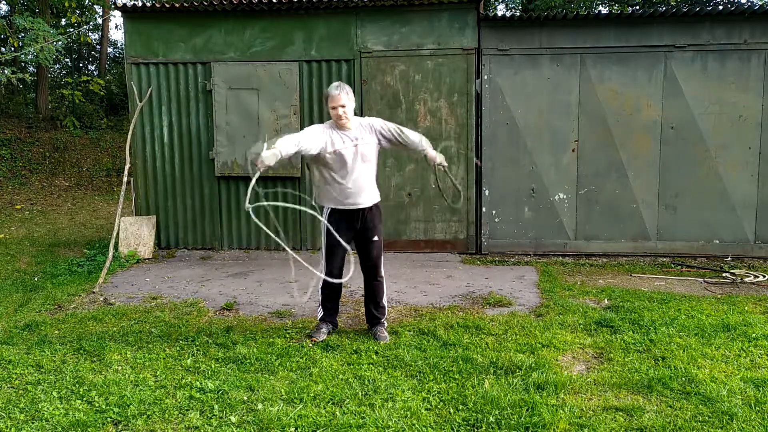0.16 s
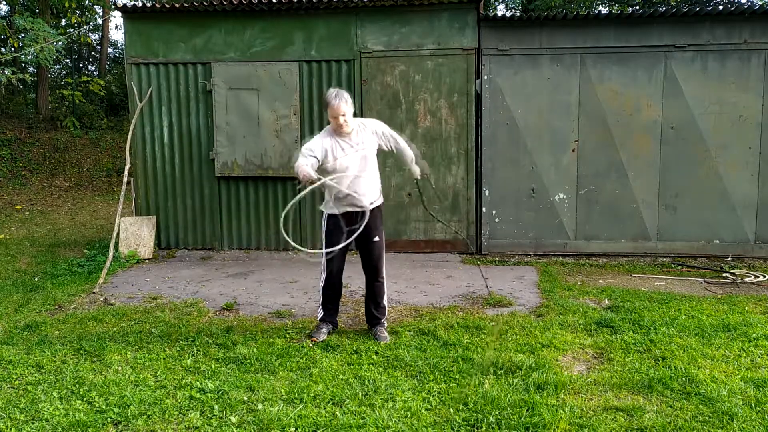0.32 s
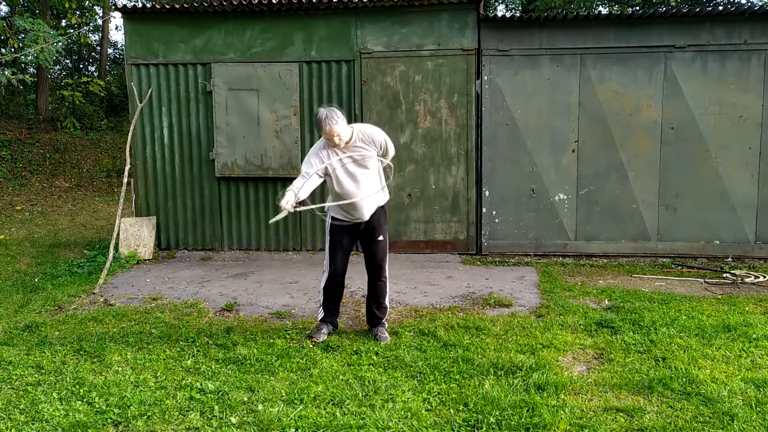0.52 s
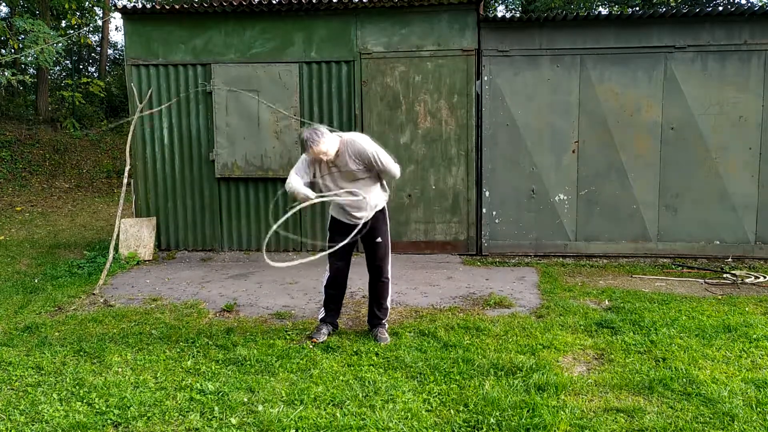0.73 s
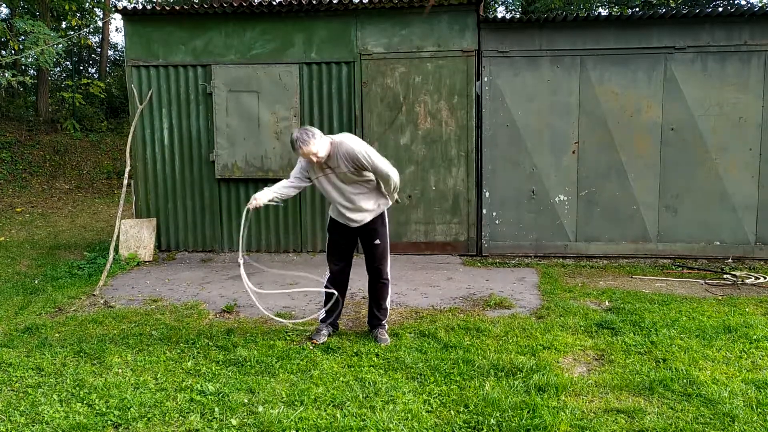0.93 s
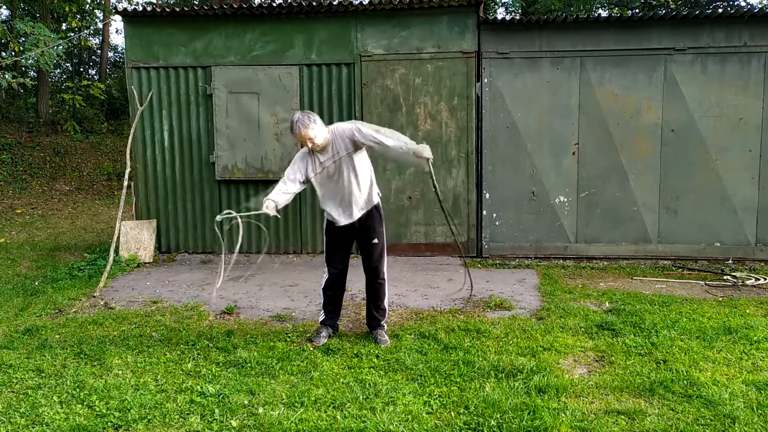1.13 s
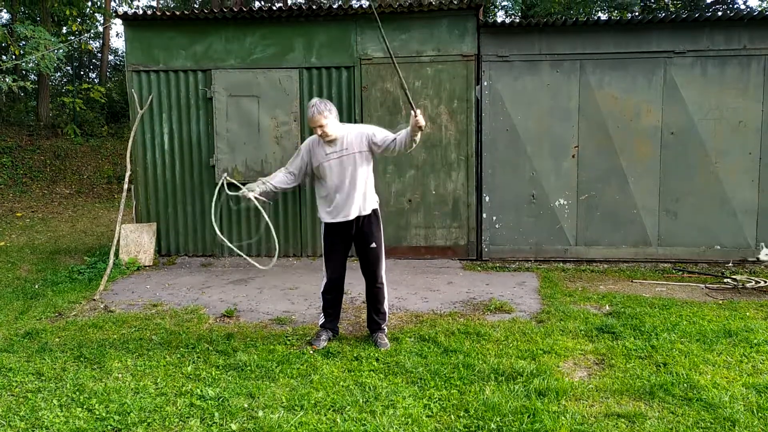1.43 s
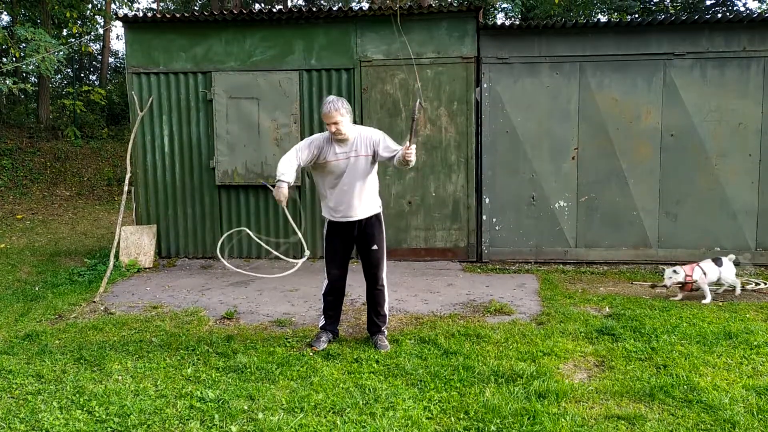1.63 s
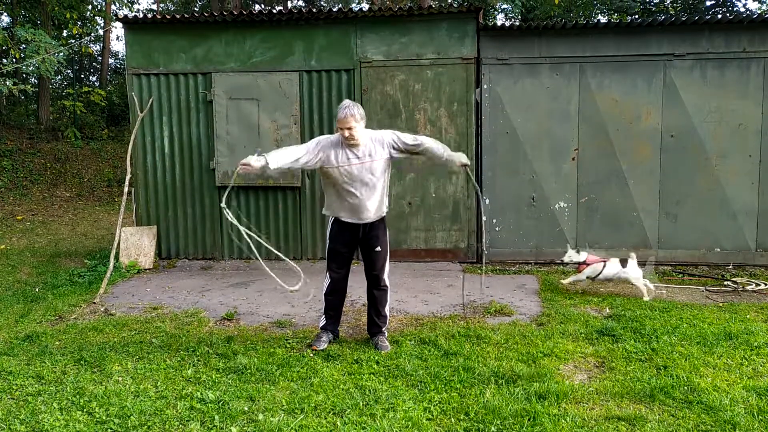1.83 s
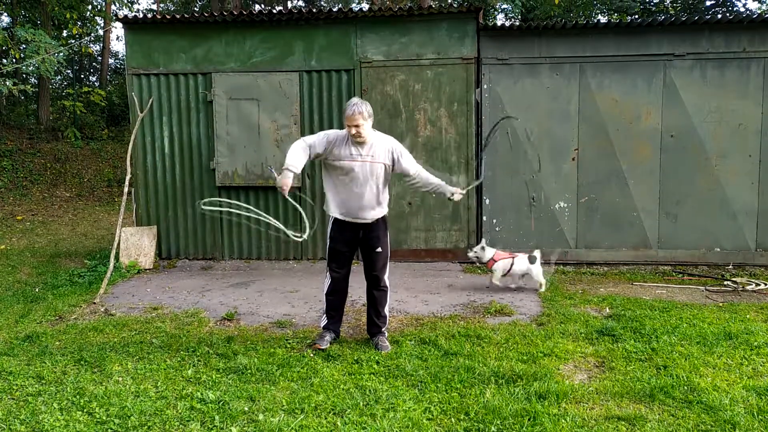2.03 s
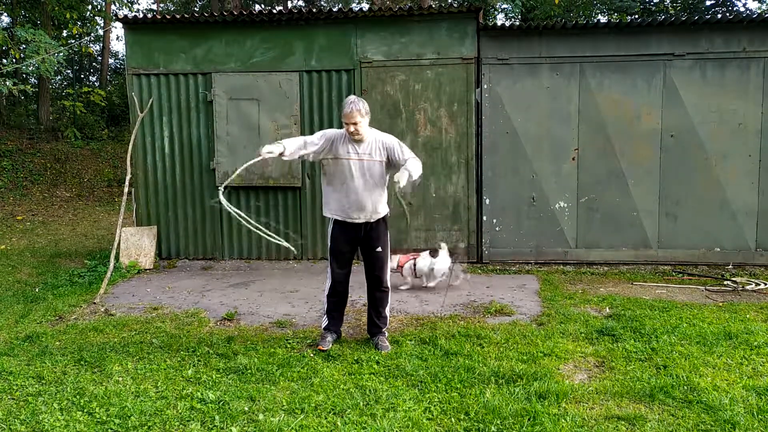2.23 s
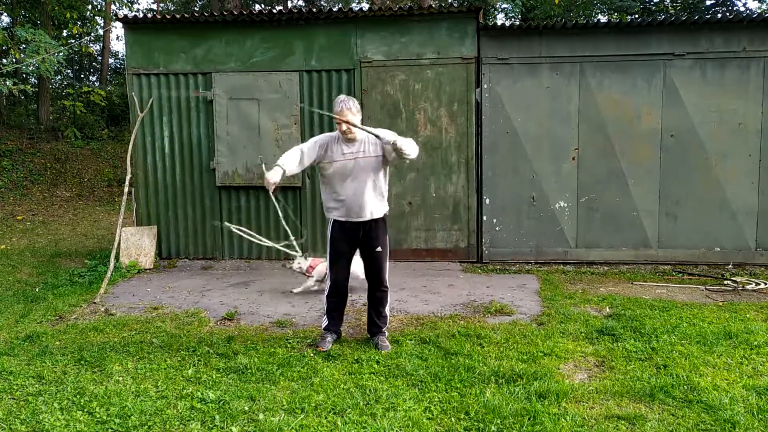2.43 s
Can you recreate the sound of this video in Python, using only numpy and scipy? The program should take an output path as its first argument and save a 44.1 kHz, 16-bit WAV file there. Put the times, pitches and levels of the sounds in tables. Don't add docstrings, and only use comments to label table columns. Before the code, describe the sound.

Loud whip cracks on a lawn beside a metal shed, at about 0.24, 1.14, 1.87 and 2.13 seconds. Each is an instant, clipped snap with small flicks around it, a low microphone thump and a bright hissing echo fading within a third of a second. Between them: faint swishes, whistling cord, cloth and grass rustle, soft thuds near 0.72, 1.3 and 2.37, tiny ticks near 1.8, quiet garden air.

```python
import sys
import numpy as np
from scipy import signal
from scipy.io import wavfile
from scipy.ndimage import uniform_filter1d

SR = 44100
rng = np.random.default_rng(int(sys.argv[2]) if len(sys.argv) > 2 else 0)


def invert_db(level):
    return 10 ** (np.asarray(level, dtype=float) / 20)


def wav_out(sig):
    wavfile.write(sys.argv[1], SR, np.round(np.clip(np.atleast_2d(sig).T, -1, 1) * 32767).astype(np.int16))


N = 114660


def evened(x):
    return x / np.sqrt(np.mean(x ** 2) + 1e-20)


def read(points, hz):
    f, value = np.transpose(points)
    return np.interp(np.log(hz + 1), np.log(f + 1), value)


def add(mix, s, sound):
    part = mix[:, round(s * SR):][:, :sound.shape[-1]]
    part += sound[..., :part.shape[1]]


def play(mix, rows, source):
    for s, *row in rows:
        add(mix, s, source(*row))


def arch(length_s, share):
    u = np.linspace(0, 1, round(length_s * SR))
    share = np.clip(share, .05, .95)
    return np.sin(np.pi / 2 * np.minimum(u / share, (1 - u) / (1 - share))) ** 2


# frequency in Hz, likeness 0-1.
LIKENESS = [(60, 0.8), (300, 1), (640, 0.017), (15000, 0.062)]


def noise(count, field_db, size=256, patch_db=0.):
    hop = size // 4
    frames, hz = count // hop + 5, np.fft.rfftfreq(size, 1 / SR)[:, None]
    a, b, c, d, patches = rng.standard_normal((frames, len(hz), 5)).T
    patches = uniform_filter1d(patches, size=5, axis=0)
    patches = evened(uniform_filter1d(patches, size=9, axis=1))
    left, other = a + 1j * b, c + 1j * d
    same = np.clip(read(LIKENESS, hz), -1, 1)
    z = np.array([left, same * left + np.sqrt(1 - same ** 2) * other])
    z = z * invert_db(field_db(hz, np.arange(frames) * hop / SR) + patch_db * patches)
    return signal.istft(z, nperseg=size, noverlap=size - hop)[1][:, :count]


# frequency in Hz, level in dB per Hz.
AIR_COLOUR = [(18, -59.5), (40, -8), (90, -5), (200, -16), (420, -17.5), (700, -23.5), (1500, -29.5),
              (5000, -30.5), (11000, -30), (16000, -44)]
AIR_DB = -59.5


def air():
    def field_db(hz, s):
        waver_db = 2.5 * np.sin(2 * np.pi * 6.5 * s - 1.5)
        return read(AIR_COLOUR, hz) + (hz > 5000) * waver_db
    return invert_db(AIR_DB) * evened(noise(N, field_db, size=1024, patch_db=4.5))


# start in seconds, length in seconds, fundamental in Hz, level in dB.
DRONE = (.86, .125, 308, -66)


def drone(length_s, hz, db):
    shape = arch(length_s, .5) ** .4
    t = np.arange(len(shape)) / SR
    partials = [invert_db(g) * np.sin(2 * np.pi * k * hz * t) for k, g in enumerate((-9, -1, 0), start=1)]
    return invert_db(db) * shape * sum(partials)[None]


# time in seconds, level in dB.
RUSTLE_LEVEL = [(0, -72), (.15, -63.5), (.3, -68), (.52, -55.5), (.66, -60), (.76, -52.5), (.88, -71),
                (1.05, -72.5), (1.12, -48), (1.399, -61), (1.55, -75), (1.75, -64), (1.85, -51.5),
                (2.05, -57.5), (2.3, -53), (2.4, -55), (2.5, -58), (2.6, -76.5)]
# frequency in Hz, level in dB per Hz.
RUSTLE_COLOUR = [(100, -22.5), (250, -2.5), (500, -9.5), (1000, -8), (2000, -13.5), (4000, -23.5)]


def rustle():
    s, db = np.transpose(RUSTLE_LEVEL)
    x = evened(noise(N, lambda hz, t: read(RUSTLE_COLOUR, hz) + 0 * t, size=512, patch_db=4.5))
    return x * invert_db(np.interp(np.arange(N) / SR, s, db))


# start in seconds, level in dB, push length in seconds.
THUDS = [
    (.722, -51, .005),
    (1.305, -34, 0.00086),
    (2.3685, -29.5, 0.00064),
]


def thud(db, push_s):
    t = np.arange(3000) / SR
    u = t / push_s
    wobble = 0.23 * np.sin(2 * np.pi * 65 * t) * np.exp(-t / 0.027)
    dip = 3.15 * u * (1 - u / 2.0) * np.exp(-u) * 2
    return invert_db(db) * (wobble - dip)[None]


# start in seconds, level in dB.
TICKS = [(.853, -58), (.8794, -57), (.9994, -60), (1.0094, -59), (1.7905, -48), (1.8005, -44),
         (1.8135, -40), (1.83, -47), (1.8378, -43), (1.8454, -44), (2.505, -48)]
TICK_DECAY_S, TICK_HZ, TICK_DB = .0007, 10000, 2.5


def tick(db):
    t = np.arange(200) / SR
    band = signal.butter(3, [.7 * TICK_HZ, 1.4 * TICK_HZ], "band", fs=SR)
    x = signal.lfilter(*band, rng.standard_normal((2, 200)))
    return invert_db(db + TICK_DB) * evened(x) * np.exp(-t / TICK_DECAY_S)


# start in seconds, length in seconds, level in dB, centre in Hz.
WHIRRS = [(1.786, .068, -51, 10500), (.213, .027, -55, 600), (1.098, .027, -54, 9000), (.1, .07, -66, 9000),
          (.1, .06, -66, 5000), (.33, .13, -50, 2200)]


def whirr(length_s, db, centre_hz):
    shape = arch(length_s, .5) ** .07
    grain = invert_db(2.5 * evened(uniform_filter1d(rng.standard_normal(len(shape)), size=90)))
    hiss = noise(len(shape), lambda hz, s: -22.0 * np.log2((hz + 50) / centre_hz) ** 2 + 0 * s, patch_db=1.5)
    return invert_db(db) * shape * grain * evened(hiss)


SWISH_START_S = [.195, .712, 1.1, 1.782, 1.82, 2.1, 1.44, .99, 1.62, 2.49, 2.34]
# length in seconds, level in dB, centre in Hz, peak share 0-1.
SWISHES = [(0.042, -50, 6000, .9), (0.03, -46, 5000, .35), (0.031, -44, 4000, .8), (.02, -62, 12000, .3),
           (0.056, -54.5, 5000, .85), (0.033, -51, 4000, .9), (.05, -56.5, 5500, .5), (.05, -67, 7000, .5),
           (.06, -57, 5000, .5), (.03, -55.5, 9000, .5), (.05, -54.5, 11000, .5)]


def swish(length_s, db, centre_hz, share):
    shape = arch(length_s, share)
    hiss = noise(len(shape), lambda hz, s: -4.0 * np.log2((hz + 50) / centre_hz) ** 2 + 0 * s)
    return invert_db(db) * shape * evened(hiss)


# start in seconds, length in seconds, level in dB, from Hz, to Hz.
WHISTLES = [(.51, 0.022, -51, 1096, 970), (.716, 0.04, -47, 1010, 830), (.77, 0.095, -62, 901, 960),
            (.75, .022, -54, 800, 730), (.728, .022, -58, 1600, 1500), (1.108, 0.025, -38, 840, 1024),
            (1.1425, 0.0081, -11.5, 4260, 3100), (1.1295, 0.0065, -32, 1830, 2120),
            (1.312, 0.056, -49, 781, 846), (1.35, 0.063, -54, 756, 676), (1.4, 0.042, -48, 727, 740),
            (1.44, 0.022, -59, 790, 780), (1.83, 0.0367, -60, 494, 820), (2.035, 0.037, -50.5, 333, 380),
            (2.04, .04, -49, 171, 200), (.36, 0.12, -51, 2280, 2200), (.77, 0.067, -60.5, 604, 424),
            (2.325, 0.024, -45, 380, 475), (2.348, 0.022, -40, 822, 1028), (2.395, 0.013, -50, 1146, 1491),
            (2.44, 0.021, -52, 1940, 1110), (1.93, 0.033, -46.5, 163, 153)]
WHISTLE_WIDTH_HZ = 192


def whistle(length_s, db, from_hz, to_hz):
    shape = arch(length_s, .45) ** .6
    glide_hz = np.linspace(from_hz, to_hz, len(shape))
    carrier = np.exp(2j * np.pi * np.cumsum(glide_hz) / SR)
    slow = rng.standard_normal((2, len(shape) + 800))
    slow = signal.lfilter(*signal.butter(2, WHISTLE_WIDTH_HZ / 2, fs=SR), slow[0] + 1j * slow[1])
    slow = slow[800:]
    tone = (carrier * (0.55 * slow / abs(slow).mean() + 1)).real
    return invert_db(db) * shape * evened(tone)[None]


# start in seconds, level in dB, pitch in Hz.
BLOWS = [(.2427, -13, 960), (.2445, -19, 440), (1.135, -22, 347), (1.1435, -19, 983), (1.871, -18.5, 930),
         (1.871, -13, 2086), (1.8708, -9, 4300), (1.892, -19.5, 950), (2.128, -12.5, 926),
         (2.132, -21, 200), (2.144, -25, 720), (2.1255, -20, 700), (1.1345, -22, 1100), (.2435, -20, 1600),
         (1.8735, -20, 1400)]


def blow(db, hz):
    cycles = np.arange(2000) / SR * hz
    return invert_db(db) * (np.sin(2 * np.pi * cycles) * np.exp(-cycles / 2.0))[None]


# frequency in Hz, level in dB per Hz.
SHOCK_COLOUR = [(120, -42), (200, -16), (750, -16), (2420, -9.5), (3760, -1.5), (7540, -8), (8580, -8.5),
                (11300, -13.5), (14900, -23.5), (16000, -21)]
DRIVE_DB, LEAD_DB, LEAD_S = 15.5, -9, .0013
LEAD_SAMPLES = 220


def add_shock(fronts, s, length_s, left_db, right_db):
    t = np.arange(-LEAD_SAMPLES, round(length_s * SR) + 440) / SR
    raw = evened(noise(len(t), lambda hz, s: read(SHOCK_COLOUR, hz) + 0 * s))
    decay = np.exp(-np.maximum(t - length_s, 0) / (.15 * length_s))
    body = np.tanh(invert_db(DRIVE_DB) * raw) * (t >= 0) * decay
    lead = invert_db(LEAD_DB) * raw * np.exp(t / LEAD_S) * (t < 0)
    add(fronts, s - LEAD_SAMPLES / SR, invert_db([[left_db], [right_db]]) * (0.8 * body + .5 * lead))


# start in seconds, length in seconds, left dB, right dB.
FLICKS = [(0.24, 0.0073, -9.5, -53), (1.1337, 0.0043, -24, -23), (1.1385, 0.0041, -17, -17),
          (1.1478, 0.0051, -9, -9), (2.1335, 0.0052, -10, -17.5), (1.8912, 0.00091, -7, -9),
          (2.1317, 0.0025, -7.5, -10), (2.13, 0.0022, -5.5, -27.5), (1.8674, .001, -16, -30)]


def add_flicks(fronts):
    for row in FLICKS:
        add_shock(fronts, *row)


GROUND_DIP_HZ, GROUND_DIP_Q = 610, 3.5


def over_lawn(fronts):
    return signal.lfilter(*signal.iirnotch(GROUND_DIP_HZ, GROUND_DIP_Q, SR), fronts)


PATCH_DB = 2.3


def tail(colour, t60, hold_s, high_db, low_db):
    def field_db(hz, s):
        tilt_db = np.where(hz > 4000, high_db, low_db) * np.log2(np.clip(hz / 4000, .25, 4))
        return read(colour, hz) + tilt_db - 60 * np.maximum(s - hold_s, 0) / read(t60, hz)
    x = noise(SR, field_db, patch_db=PATCH_DB)
    return x / np.sqrt(np.mean(x[:, :900] ** 2))


# frequency in Hz, level in dB per Hz.
ECHO_COLOUR = [(120, -51.5), (200, -15.5), (635, -27.5), (986, -16.5), (1270, -17.5), (2250, -5.5),
               (4350, -2), (10100, -8), (16000, -17)]
FAR_COLOUR = [(180, -43), (300, -16), (801, -25.5), (870, -9), (2070, -6), (3400, -3), (9880, -3.5),
              (14000, -18), (16000, -26)]
# frequency in Hz, time to fall 60 dB in seconds.
ECHO_T60 = [(300, 0.26), (1000, .35), (2500, 0.34), (5000, 0.33), (10000, 0.29), (16000, 0.15)]
FAR_T60 = [(300, 0.4), (2000, 1.43), (5000, 1.24), (10000, 0.69), (16000, 0.98)]
# start in seconds, shock length in seconds, echo delay in seconds, echo dB, far trees dB.
CRACKS = [
    (.2424, 0.0027, 0.019, -11.5, -32),
    (1.1422, 0.0053, 0.02, -16.5, -29.5),
    (1.8707, 0.0017, 0.017, -11.5, -33),
    (2.128, 0.0017, .0245, -15.5, -29.5),
]
# deaf left in dB, deaf right in dB, echo swell in seconds.
OVERLOAD = [(-3.5, -33, 0.0083), (-1, -2, .006), (-16, -18, 0.0045), (-5.5, -8.5, 0.005)]
PUSH = [(-.17, .38), (.03, .08), (-.22, .27), (-.09, .37)]
# above 4 kHz, below 4 kHz in dB per octave, hold in seconds.
TILT = [(0.27, -1.5, .025), (-0.17, 4, 0.04), (-1.2, 0, 0.018), (-1.2, 1.5, 0.0091)]
SHOCK_DB, GRAIN_DB, SLAP_DB, SLAP_S, LEFT_DB = -3.5, 1.2, 4, 0.0058, 1
SWING_HZ, SWING_Q, SMOOTH_HZ, LEFT_LAG_S = 55, 1.7, 300, .0015


def crack(length_s, delay_s, echo_db, far_db, deaf_l, deaf_r, swell_s, push_l, push_r, high_db, low_db, hold_s):
    t = np.arange(SR) / SR
    near = invert_db(echo_db) * tail(ECHO_COLOUR, ECHO_T60, delay_s + hold_s, high_db, low_db)
    grain = invert_db(GRAIN_DB * evened(uniform_filter1d(rng.standard_normal((2, SR)), size=14, axis=1)))
    far = invert_db(far_db) * tail(FAR_COLOUR, FAR_T60, delay_s, high_db, low_db)

    wake = np.clip((t - delay_s + swell_s) / (2 * swell_s), 0, 1)
    deaf_db = np.array([[deaf_l], [deaf_r]]) * (1 - wake ** 3.0)
    slap_db = SLAP_DB * np.exp(-((t - delay_s - swell_s) / SLAP_S) ** 2)
    heard = (near * evened(grain) + far) * invert_db(deaf_db + [[LEFT_DB], [0]] + slap_db)
    heard = heard * np.minimum(t / length_s, 1) * np.minimum((1 - t) / 0.28, 1)

    w = 2 * np.pi * SWING_HZ
    high_pass = signal.bilinear([1, 0, 0], [1, w / SWING_Q, w * w], SR)
    swing = signal.lfilter(*high_pass, 1. * (t < .0028))
    swing = signal.lfilter(*signal.butter(2, SMOOTH_HZ, fs=SR), swing)
    return heard + np.array([push_l * np.interp(t - LEFT_LAG_S, t, swing), push_r * swing])


def scene():
    mix = air()
    fronts = np.zeros((2, N))
    for (s, length_s, *echo), stun, push, tilt in zip(CRACKS, OVERLOAD, PUSH, TILT):
        add(mix, s, crack(length_s, *echo, *stun, *push, *tilt))
        add_shock(fronts, s, length_s, SHOCK_DB, SHOCK_DB)
    add_flicks(fronts)
    play(fronts, BLOWS, blow)
    play(mix, WHISTLES, whistle)
    play(mix, THUDS, thud)
    play(mix, [DRONE], drone)
    for s, row in zip(SWISH_START_S, SWISHES):
        add(mix, s, swish(*row))
    mix = mix + rustle() + over_lawn(fronts)
    play(mix, WHIRRS, whirr)
    play(mix, TICKS, tick)
    return mix


def top_cut(x):
    return signal.sosfilt(signal.butter(12, 16340, fs=SR, output="sos"), x)


def record(dry):
    cut = signal.sosfilt(signal.butter(5, 33, "high", fs=SR, output="sos"), dry)
    edge = signal.firwin(301, 15650, fs=SR)[None]
    limited = signal.oaconvolve(cut, edge, "same")
    return top_cut(np.clip(limited, -.95, .95))


dry = scene()
out = record(dry)
wav_out(out)
```